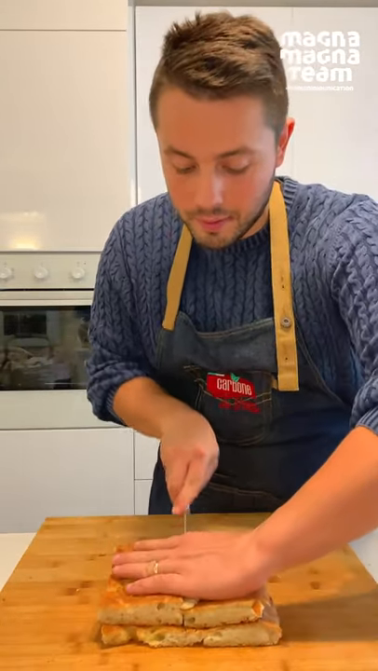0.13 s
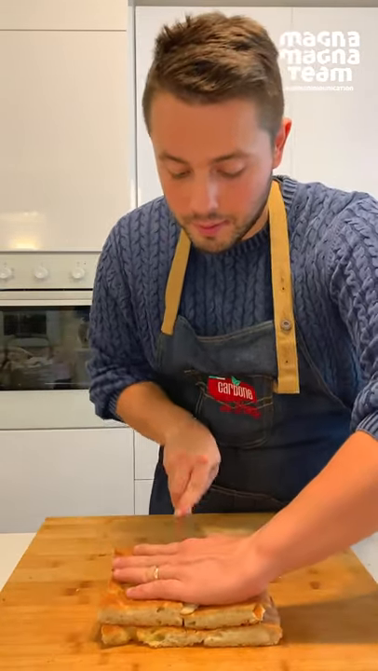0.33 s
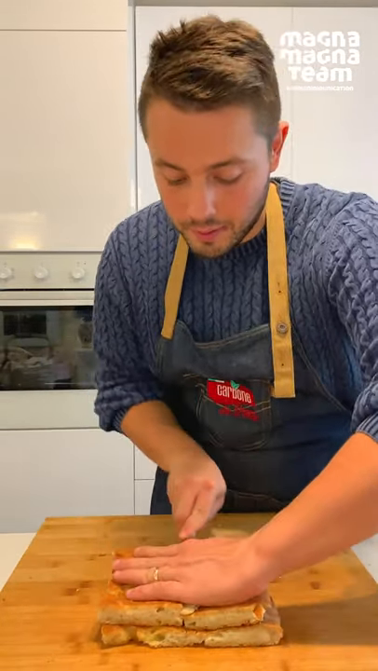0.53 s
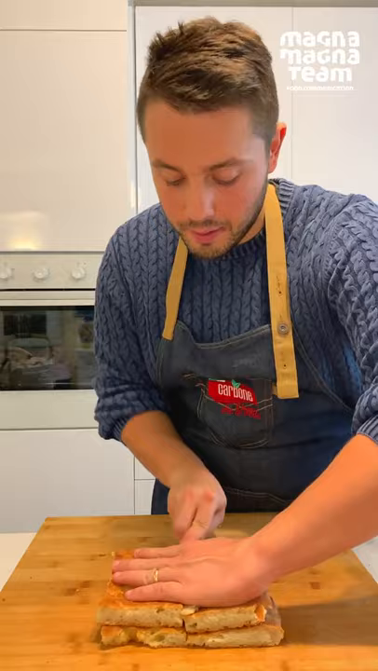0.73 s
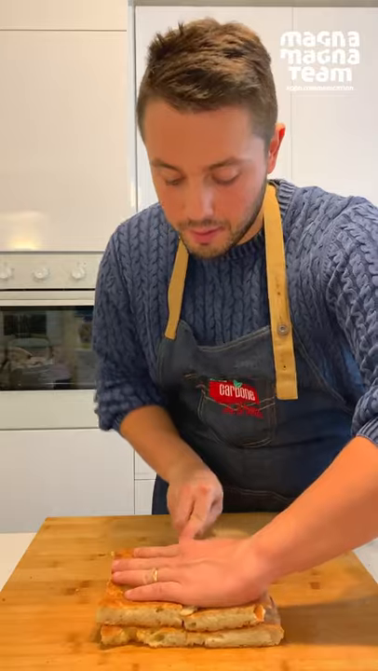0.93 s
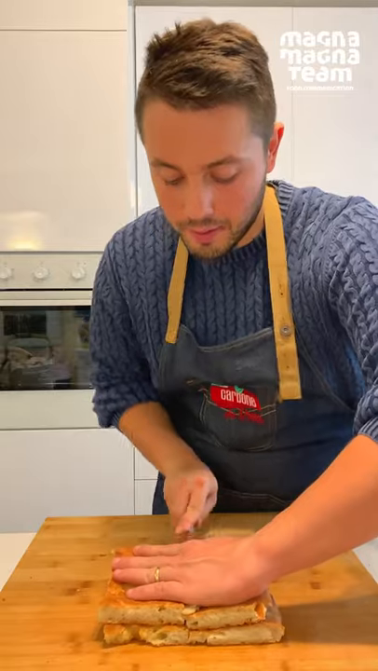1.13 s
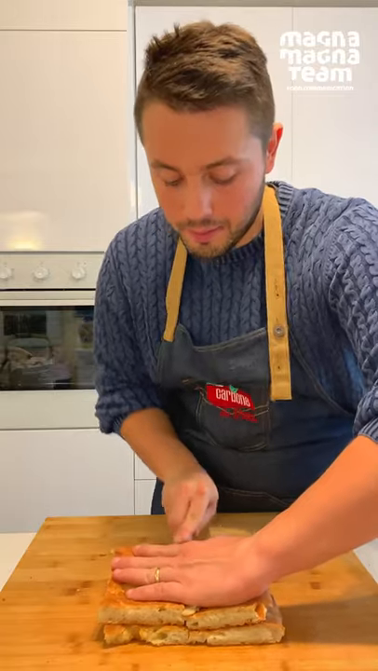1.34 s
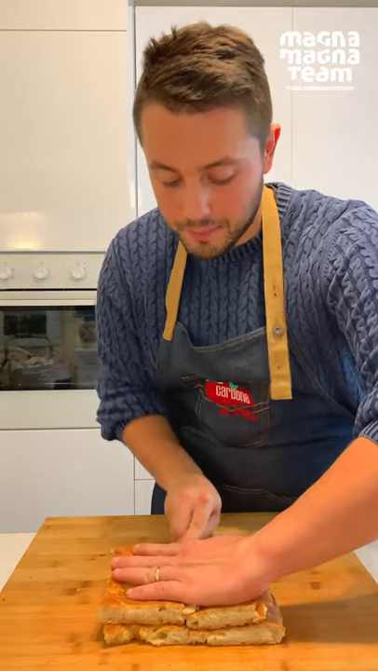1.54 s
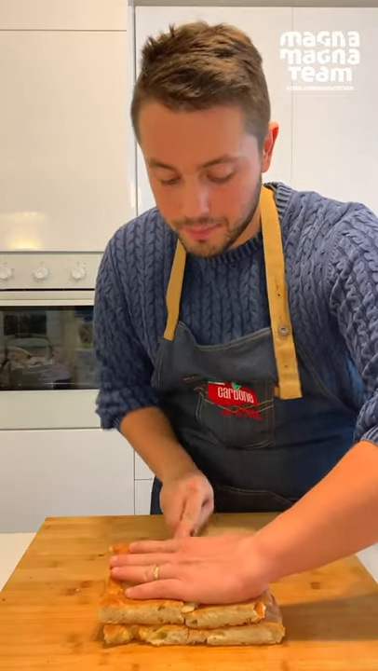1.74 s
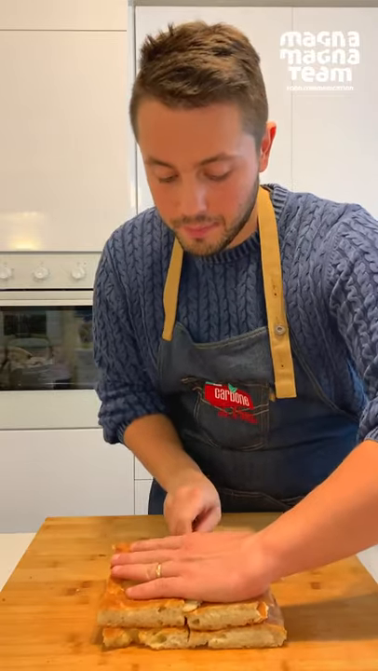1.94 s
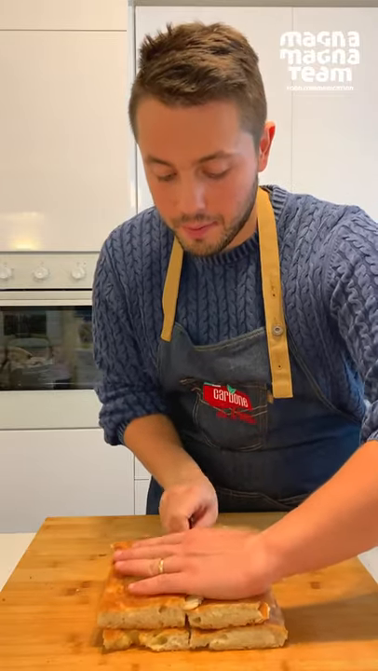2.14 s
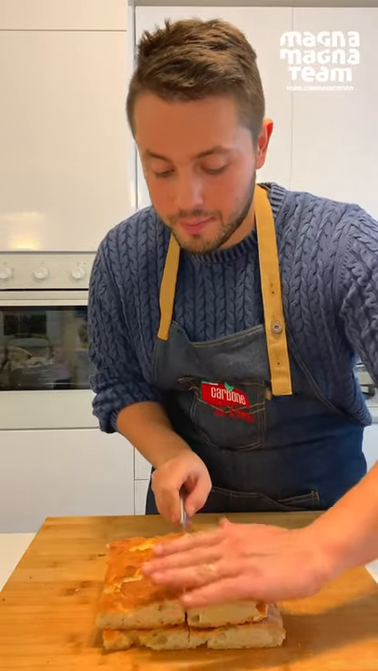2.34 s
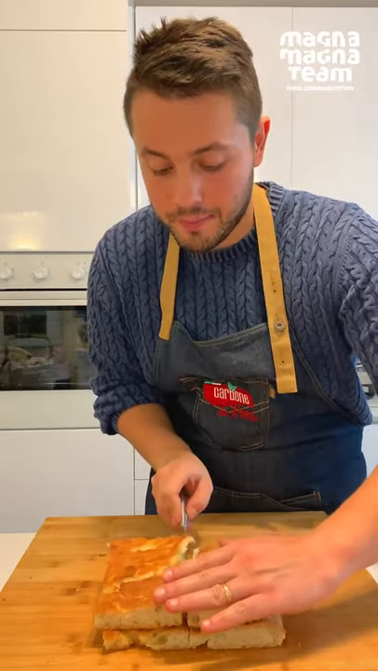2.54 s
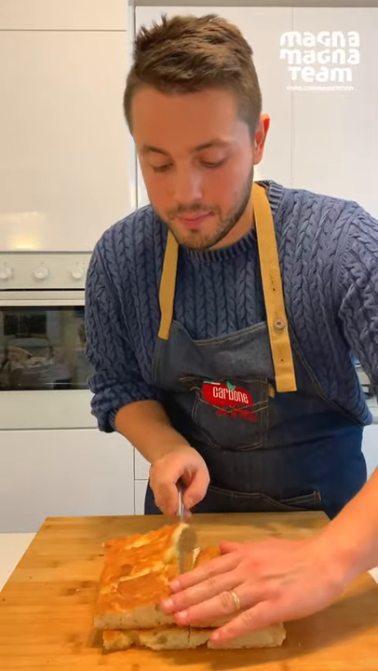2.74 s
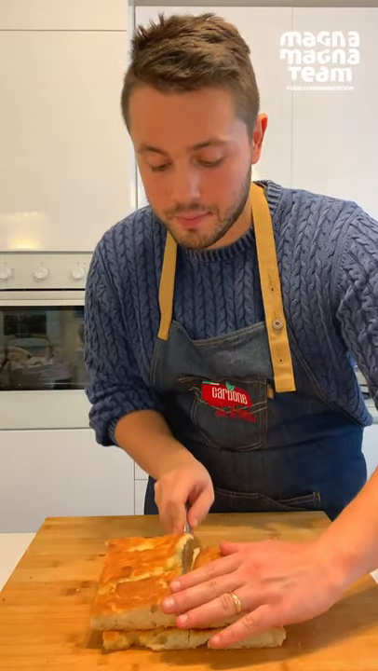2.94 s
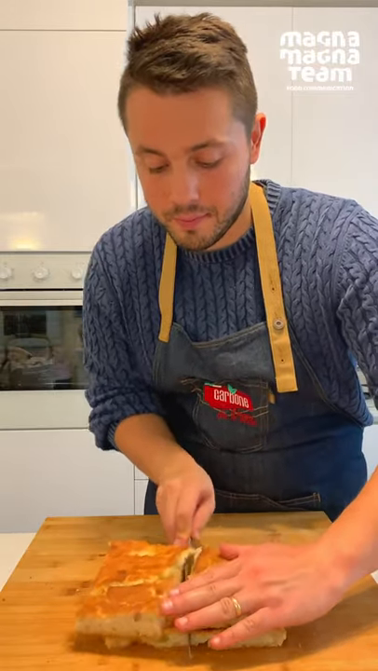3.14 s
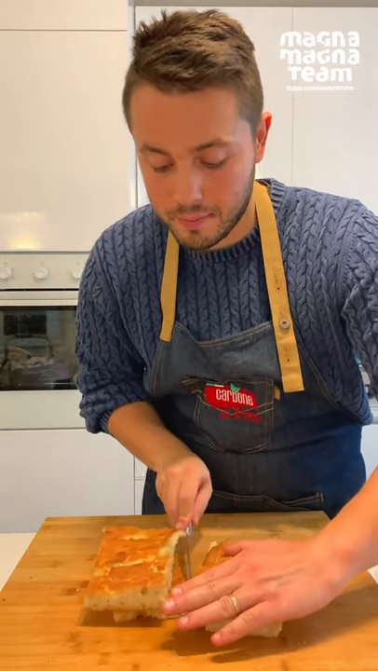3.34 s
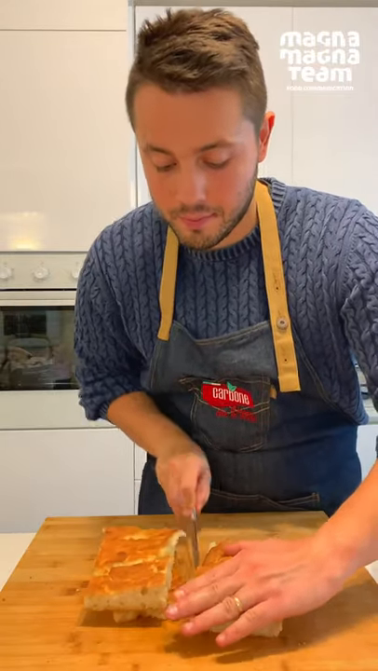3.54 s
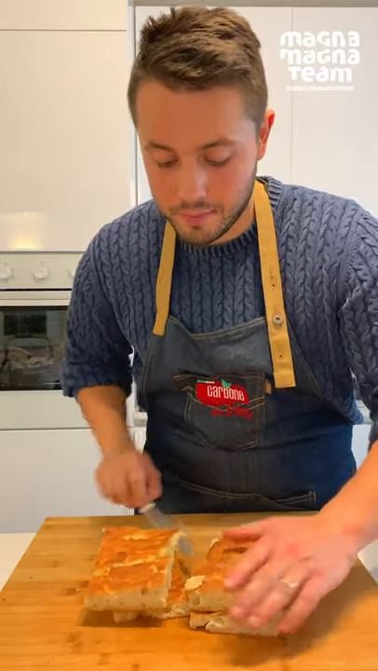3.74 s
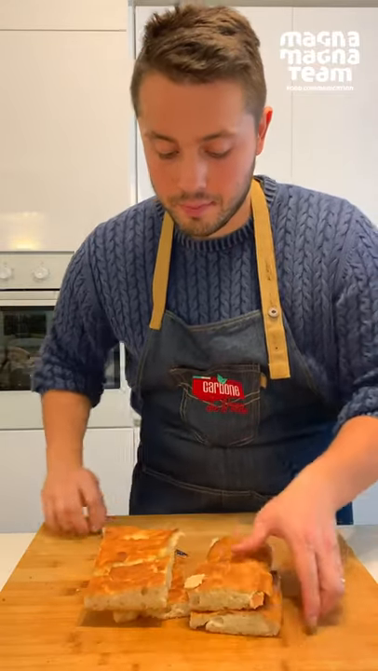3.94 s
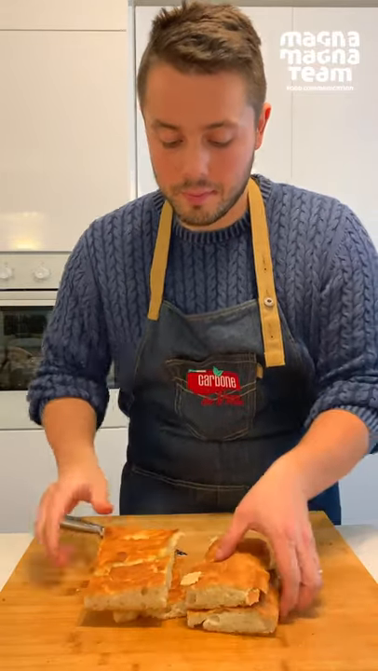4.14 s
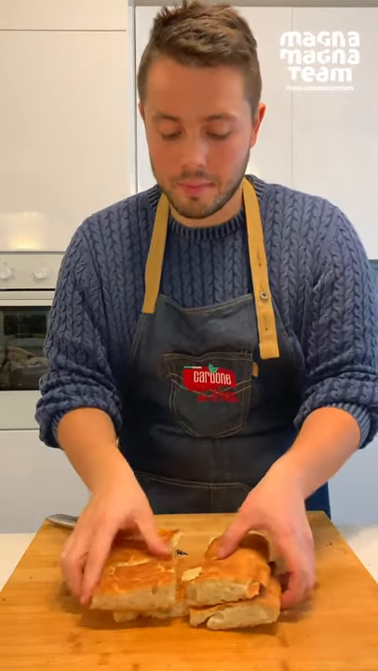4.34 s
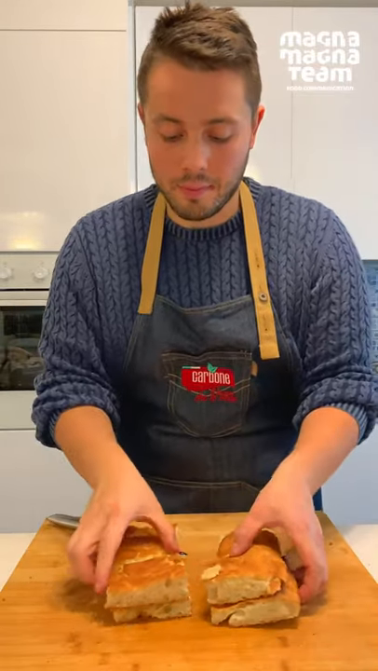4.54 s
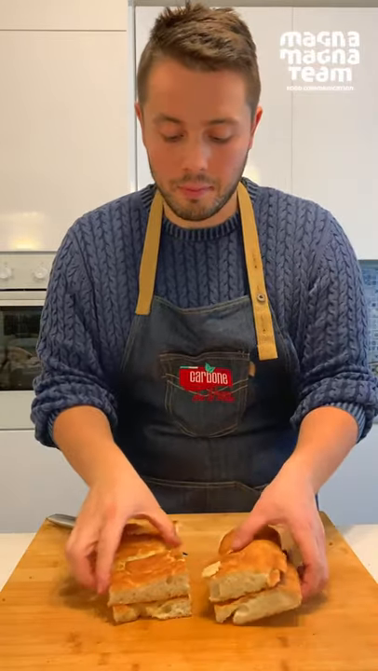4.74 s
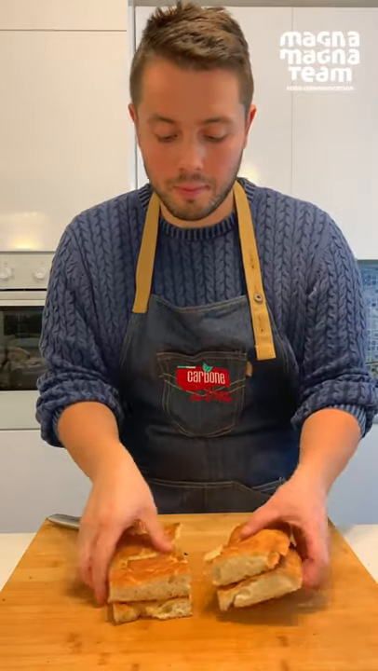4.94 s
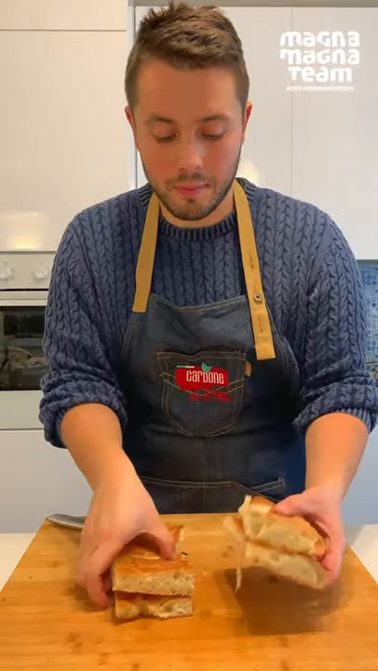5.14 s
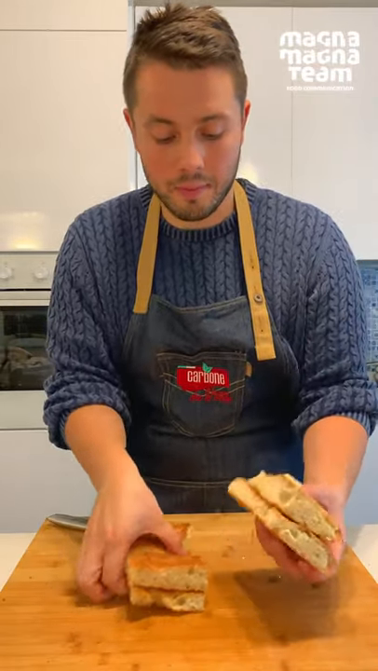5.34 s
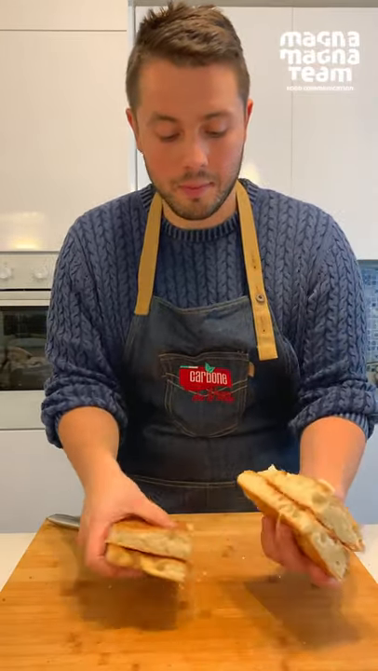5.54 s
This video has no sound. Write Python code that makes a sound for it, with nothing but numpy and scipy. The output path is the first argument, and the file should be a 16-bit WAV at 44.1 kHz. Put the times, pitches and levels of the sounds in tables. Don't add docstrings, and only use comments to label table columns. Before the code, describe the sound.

Stereo, near pickup with slight room echo: about seven brisk strokes a second grow louder through dry, crunchy bread, then ease off, with small crust pops and a low rumble of the shaken counter. Quiet handling, two longer scraping strokes on the board, then a knife landing in a double sharp clack with light chatter and a thin fading ring. Gentle crusty rustles end it over a low refrigerator hum.

```python
import sys
import numpy as np
from scipy import signal
from scipy.fft import rfft, irfft
from scipy.io import wavfile

SR = 44100
rng = np.random.default_rng(int(sys.argv[2]) if len(sys.argv) > 2 else 0)


def convert_level_to_amplitude(level_db):
    exponent = np.asarray(level_db, float) / 20
    return 10 ** exponent


def wrap_up_sound(samples):
    columns = np.atleast_2d(samples).T
    tamed = np.clip(columns, -1, 1)
    steps = np.round(tamed * 32767).astype(np.int16)
    wavfile.write(sys.argv[1], SR, steps)


N = 246078
SLOW = 40
DROP = slice(round(3.7 * SR), round(4.6 * SR))

# pitch in Hz, level in dB, time to fade by 60 dB in seconds.
BLADE_TONES = [(3080, -27.5, .51), (3553, -44, .6), (4350, -32.5, .6), (5040, -26.5, .7), (6010, -1, .084),
               (6175, -14, .3), (7418, -30, .59), (8200, -24, .23), (8423, -16, .5), (8614, -19, .43),
               (9388, -27, .5), (10240, -35, .31), (10560, -29, .3), (11520, -38.5, .26)]
# pitch in Hz, level in dB, time to fade by 60 dB in seconds.
COUNTER_TONES = [(252, -17.5, 0.084), (440, -20, 0.013), (597, -23.5, 0.018), (1050, -2.5, 0.045),
                 (1430, 4.5, 0.025), (1750, 4, .025), (2322, 1.5, 0.041)]


def rms_one(x):
    return x / np.sqrt(np.mean(x ** 2) + 1e-20)


def full(slow):
    return np.repeat(slow, SLOW)[:N]


def at_hz(points, hz):
    point_hz, values = np.transpose(points)
    return np.interp(np.log1p(hz), np.log1p(point_hz), values)


def drift(rate_hz):
    r = np.exp(-2 * np.pi * rate_hz * SLOW / SR)
    noise = rng.standard_normal(N // SLOW + 2001)
    return rms_one(signal.lfilter([1], [1, -2 * r, r * r], noise)[2000:])


def band_pass(x, low_hz, high_hz):
    return signal.sosfilt(signal.butter(2, [low_hz, high_hz], "band", fs=SR, output="sos"), x)


def ring(hits, hz, t60_s):
    r, w = convert_level_to_amplitude(-60 / (t60_s * SR)), 2 * np.pi * hz / SR
    return signal.lfilter([0, np.sin(w)], [1, -2 * r * np.cos(w), r * r], hits + 1e-18)


def clicks(times_s, levels_db):
    out = np.zeros(N)
    out[np.round(np.multiply(times_s, SR)).astype(int)] = convert_level_to_amplitude(np.asarray(levels_db))
    return out


def grains(per_s, spread_db, size):
    size_draw, time_draw = rng.random((2, 2, size))
    sizes = convert_level_to_amplitude(spread_db * np.minimum(-np.log(size_draw + 1e-9), 4.0))
    chance = per_s / SR
    return sizes * np.sign(time_draw - chance / 2) * (time_draw < chance)


def add_pulse(out, s, db, hz, width_s, fall):
    reach = np.arange(-400, 400)
    age = reach / SR / width_s
    bend = np.logaddexp(age, -age)
    wave = np.cos(2 * np.pi * hz * width_s * (age - fall * bend))
    out[round(s * SR) + reach] += convert_level_to_amplitude(db) * np.exp(-age ** 2) * wave


def swells(peak_s, rise_s, fall_s, db, bluntness):
    peak_s, rise_s, fall_s, db = [np.reshape(column, (-1, 1)) for column in (peak_s, rise_s, fall_s, db)]
    off_s = np.arange(N // SLOW + 1) * SLOW / SR - peak_s
    span_s = np.where(off_s < 0, rise_s, fall_s)
    edge_loss_db = 19.5
    loss_db = edge_loss_db * np.abs(off_s / span_s) ** np.where(off_s < 0, *bluntness)
    return np.sum(convert_level_to_amplitude(2 * (db - np.minimum(loss_db, 200))), axis=0)


def room_air():
    # pitch in Hz, level per Hz in dB.
    air_color = [(20, -22), (40, -6), (62, 3.5), (85, -6.5), (130, -0.5), (250, -2), (330, 1.5),
                 (500, -1.5), (700, -7), (1000, -5.5), (2000, -20.5), (3100, -33), (6300, -36.5),
                 (11000, -42)]
    hz = np.maximum(np.fft.rfftfreq(N, 1 / SR), 1)
    noise = irfft(rfft(rng.standard_normal((2, N))) * convert_level_to_amplitude(at_hz(air_color, hz)), N)
    return convert_level_to_amplitude(-55) * rms_one(noise)


def refrigerator():
    # pitch in Hz, level in dB, width of the wavering in Hz.
    hum_tones = [(101.3, -62, 6), (59, -74.5, 8)]
    turn = 2 * np.pi * np.arange(N) / SR
    out = np.zeros(N)
    for hz, db, width_hz in hum_tones:
        strength = full(convert_level_to_amplitude(db + 3.5 + 1.7 * drift(width_hz)))
        out += strength * np.sin(hz * turn + 0.4 * full(drift(width_hz)))
    return out


def effort():
    # peak in seconds, rise in seconds, fall in seconds, crumb level in dB, crust level in dB.
    saw_strokes = [(.015, 0.04, 0.11, -51, -56), (0.157, 0.078, 0.13, -41.5, -50.5),
                   (0.296, 0.029, 0.097, -40, -51), (.428, 0.041, 0.095, -37, -46),
                   (0.569, 0.047, 0.071, -35.5, -52.5), (0.691, 0.075, 0.099, -33, -51.5),
                   (.815, 0.044, 0.081, -23, -44.5), (.915, 0.036, .12, -27, -46),
                   (1.097, 0.089, .06, -29, -52), (1.228, 0.13, 0.11, -38.5, -52.5),
                   (1.352, 0.052, 0.1, -33, -42.5), (1.45, 0.041, 0.11, -30, -43),
                   (1.593, 0.056, 0.076, -30.5, -41.5), (1.719, 0.12, 0.16, -37.5, -51.5),
                   (1.919, 0.085, 0.13, -52.5, -61), (2.951, 0.029, 0.085, -58, -62),
                   (3.03, 0.075, 0.016, -45, -59.5), (3.222, 0.17, 0.15, -39, -51),
                   (3.488, 0.08, .1, -39, -54.5), (3.78, 0.044, 0.11, -60, -63)]
    # peak, rise and fall in seconds, crumb level in dB, crust level in dB.
    hand_moves = [(2.1, 0.068, 0.12, -86, -72), (2.17, 0.024, 0.093, -49.5, -80),
                  (2.245, 0.024, .1, -55.5, -69), (3.639, 0.03, 0.11, -73, -67.5),
                  (4.4, 0.13, 0.16, -59, -68.5), (4.531, 0.047, 0.058, -50, -69),
                  (4.63, 0.038, .04, -56, -73.5), (4.75, 0.043, 0.24, -58.5, -72.5),
                  (4.92, 0.073, 0.069, -54.5, -66.5), (5.09, .04, 0.1, -65, -67),
                  (5.261, 0.091, 0.095, -54.5, -61.5), (5.41, 0.071, 0.092, -57, -62.5),
                  (5.52, 0.053, 0.063, -74.5, -61.5)]
    peak_s, rise_s, fall_s, crumb_db, crust_db = np.transpose(saw_strokes + hand_moves)

    def level_db(db, bluntness, rest_db):
        power = swells(peak_s, rise_s, fall_s, db, bluntness)
        return full(10 * np.log10(power + convert_level_to_amplitude(2 * rest_db)))

    return level_db(crumb_db, (1.801, 1.25), -75.5), level_db(crust_db, (4.0, 1.84), -92)


def fractures(spectrum, low_hz, high_hz, per_s, spread_db, cycles, patchy_db, count, shaping_db):
    breaks = grains(per_s, spread_db, N)
    dealt = rng.integers(0, count, N)
    out = np.zeros((2, N))
    for k, hz in enumerate(np.geomspace(low_hz, high_hz, count)):
        gain_db = at_hz(spectrum, hz) + 10 * np.log10(hz) + patchy_db * drift(5.9) + shaping_db(hz)
        r, w = convert_level_to_amplitude(-60 * hz / cycles / SR), 2 * np.pi * hz / SR
        even = np.sqrt(1 - r * r)
        hits = breaks * ((dealt == k) * full(convert_level_to_amplitude(gain_db)))
        out += signal.lfilter([even, 0, -even], [1, -2 * r * np.cos(w), r * r], hits)
    return rms_one(out)


def sawing():
    # pitch in Hz, level per Hz in dB.
    crumb_color = [(71, -26), (120, -10.5), (194, -13.5), (327, -5), (591, 0), (659, -2), (706, -4.5),
                   (1020, -6), (1920, -15.5), (3200, -25.5), (4160, -54), (7040, -120)]
    # pitch in Hz, level per Hz in dB.
    crust_color = [(1530, -31), (2600, -7.5), (3830, -1), (5950, -3), (6470, -1), (9600, -4.5),
                   (11100, 1.5), (11800, -26), (12200, -42), (15900, -75), (22000, -120)]
    # time in seconds, pitch in Hz.
    loaf_tone = [(0, 580), (.16, 674), (.3, 890), (.43, 656), (.82, 755), (.93, 900), (1.07, 670),
                 (1.35, 960), (1.6, 850), (1.9, 666), (2.9, 745), (3.2, 930), (3.55, 940), (4.3, 700)]
    # pitch in Hz, lift in dB, width in octaves.
    board_lifts = [(425, 7.5, 0.11), (1050, 7, 0.072), (1412, -5, .25), (2050, 2.2, .1)]
    # pitch in Hz, level in dB, time to fade by 60 dB in seconds.
    song_tones = [(5020, -5, .5), (5090, -6, .4), (8420, -5, .5), (8500, -5, .4), (10490, -2, .7),
                  (10580, -2, .6), (6500, -6, .2)]
    crumb_db, crust_db = effort()
    step_s = np.arange(N // SLOW + 1) * SLOW / SR
    loaf_s, loaf_points_hz = np.transpose(loaf_tone)
    loaf_hz = np.interp(step_s, loaf_s, loaf_points_hz)
    rasp_db = 3.5 + 0.64 * (crust_db - crumb_db)[::SLOW]
    board_from_s, palms_from_s = 2.9, 4.3
    scraping = (step_s > board_from_s) & (step_s < palms_from_s)

    def palm_db(hz):
        return -8 / (1 + (6400 / hz) ** 8) * (step_s > palms_from_s)

    def loaf_db(hz):
        lift_db = 5.6 * np.exp(-(np.log2(hz / loaf_hz) / 0.26) ** 2)
        for top_hz, db, octaves in board_lifts:
            lift_db += db * np.exp(-(np.log2(hz / top_hz) / octaves) ** 2) * scraping
        lift_db += 3.6 / (1 + (hz / 140) ** 4)
        return lift_db + (rasp_db + 13.0) / (1 + (1300 / hz) ** 4)

    crumb = fractures(crumb_color, 66.7, 2653, per_s=4000, spread_db=1.25, cycles=21.0, patchy_db=3.1,
                      count=30, shaping_db=loaf_db)
    crust = fractures(crust_color, 3120, 9910, per_s=11000, spread_db=3.5, cycles=33.0, patchy_db=2.6,
                      count=12, shaping_db=palm_db)
    blade = rms_one(sum(ring(crust[0], hz, 0.12) for hz, db, t60_s in BLADE_TONES[1:16:3]))
    rub = convert_level_to_amplitude(crust_db - 15) * full(scraping) * rng.standard_normal((2, N))
    song = np.zeros((2, N))
    for hz, db, t60_s in song_tones:
        song += convert_level_to_amplitude(db) * np.sqrt(30 / (t60_s * SR)) * ring(rub, hz, t60_s)
    return song + convert_level_to_amplitude(crumb_db + 0.84) * crumb + convert_level_to_amplitude(crust_db + 2.0) * (crust + convert_level_to_amplitude(-13.5) * blade)


def counter_shaking():
    # time in seconds, level in dB.
    arm_shakes = [(.07, -63), (.32, -51), (.54, -50), (.76, -56), (.97, -49.5), (1.25, -50), (1.55, -64),
                  (1.99, -57), (3.15, -58.5)]
    s, db = np.transpose(arm_shakes)
    power = swells(s, 0.15, 0.15, db, (1.5, 1.5))
    return full(np.sqrt(power)) * rms_one(band_pass(rng.standard_normal(N), 40, 90))


def snaps():
    # time in seconds, peak in dB, pitch of the pock in Hz, brightness of the tick in dB.
    crust_breaks = [(0.084, -34, 1180, -8), (0.175, -25.5, 716, -10), (0.291, -26.5, 1050, -5),
                    (0.41, -26, 664, -12), (0.643, -36, 640, -19), (0.784, -28, 800, -19),
                    (0.895, -20, 810, -10), (1.322, -32, 1280, -9), (1.58, -21, 1090, -12),
                    (3.028, -29, 987, -12), (5.264, -30.5, 950, -4.5)]
    out = np.zeros(N)
    for s, db, hz, bright_db in crust_breaks:
        add_pulse(out, s + 0.0016, db - 2.5, hz, 0.88 / hz, 0.2)
        add_pulse(out, s + 0.00027, db + bright_db, 5500, 0.00012, 0)
    return out


def knocks():
    # time in seconds, peak in dB, handle pitch in Hz,
    # edge tick in dB, counter level in dB.
    contacts = [
        (3.8112, -38.5, 2020, -9.5, -6.5),
        (3.8371, -27.5, 1890, 2.5, -8),
        (3.904, -34.5, 1610, -0.5, -8),
        (3.933, -28, 1970, -17.5, -12.5),
        (3.9441, -1.5, 1962, -20, -12.5),
        (3.973, -33.5, 1870, -9.5, -18),
        (3.981, -7.5, 1780, -3.5, -23),
        (3.9958, -24.5, 1890, -13, -18),
    ]
    # pitch in Hz, level in dB, time to fade by 60 dB in seconds.
    held_tones = [(2000, -4, .09), (2751, -21.5, .11), (3063, -8, .5), (3540, -2, .2), (4370, -16.5, .33),
                  (4800, -20, .5), (5860, -3.5, .14), (7197, -11, .34), (8400, -10, .2), (9340, -12, .19)]
    # start in seconds, pitch in Hz, level in dB, time to fade by 60 dB in seconds.
    lasting_tone = (3.946, 6977, -64, 2.8)
    s, db, handle_hz, tick_db, counter_db = np.transpose(contacts)
    out = np.zeros(N)
    for t, peak_db, hz, edge_db, low_db in zip(s, db, handle_hz, tick_db, counter_db):
        add_pulse(out, t + 0.00028, peak_db + low_db + 0.5, 1.41 * hz, 0.0005, 0.2)
        add_pulse(out, t + 0.001414, peak_db + 0.34, hz, 0.00055, 0.25)
        add_pulse(out, t + 0.0011, peak_db + edge_db, 5950, 0.0007, 0)
        add_pulse(out, t + 0.00371, peak_db + low_db - 5.5, 1150, 0.0012, 0.3)
        add_pulse(out, t + 0.005, peak_db + low_db - 8.0, 450, 0.0022, 0.3)
    for hz, tone_db, t60_s in COUNTER_TONES:
        hits = clicks(s + 0.002, db + counter_db + tone_db - 8.5)
        out[DROP] += ring(hits[DROP], hz, t60_s)
    blade_db = db + tick_db - 7.5
    held = s < 3.92
    for tones, used, longest_s in (held_tones, held, 0.14), (BLADE_TONES, ~held, 0.5):
        for hz, tone_db, t60_s in tones:
            chance_db = rng.normal(0, 4.5, len(s))
            hits = clicks(s[used], (blade_db + tone_db + chance_db)[used])
            out[DROP] += ring(hits[DROP], hz, min(t60_s, longest_s))
    start_s, hz, tone_db, t60_s = lasting_tone
    return out + ring(clicks([start_s], [tone_db]), hz, t60_s)


def rocking_db(part):
    # time in seconds, upper blade level in dB, counter level in dB, lower blade level in dB.
    wakings = [
        (3.813, -46, -56.5, -51),
        (3.839, -37, -41.5, -33.5),
        (3.957, -34.5, -35.5, -54.5),
        (3.984, -30.5, -40.5, -45.5),
    ]
    s = np.array(wakings)[:, :1]
    level_db = np.array(wakings)[:, part + 1, None]
    age_s = np.arange(N)[DROP] / SR - s
    late_s = np.maximum(age_s, 0)
    tail_db_per_s = (103.5, 49.5, 60.5)[part]
    quick_fade = convert_level_to_amplitude(-2 * 247 * late_s)
    slow_tail = convert_level_to_amplitude(2 * (-4.5 - tail_db_per_s * late_s)) * (age_s <= age_s[-2])
    wake = convert_level_to_amplitude(2 * (level_db + 1398 * np.minimum(age_s, 0)))
    return 10 * np.log10(np.sum(wake * (quick_fade + slow_tail), axis=0) + 1e-12)


def chatter():
    upper_db, counter_db, lower_db = rocking_db(0), rocking_db(1), rocking_db(2)
    taps = grains(3000, 1.4, len(upper_db))
    tones = []
    for hz, db, t60_s in BLADE_TONES:
        strength = convert_level_to_amplitude(0.55 * db + 3.9 * full(drift(16))[DROP])
        tones.append(strength * rms_one(ring(taps, hz, 0.049)))
    lower, upper = rms_one(sum(tones[1:4])), rms_one(sum(tones[4:]))
    freed = np.interp(np.arange(N)[DROP] / SR, [3.92, 3.95], [0.4, 1])
    edge = rms_one(band_pass(taps, 5000, 11000))
    heel = rms_one(band_pass(taps, 2500, 5200))
    wood = rms_one(sum(convert_level_to_amplitude(db) * ring(taps, hz, 0.39 * t60_s) for hz, db, t60_s in COUNTER_TONES))
    out = np.zeros((2, N))
    out[:, DROP] += convert_level_to_amplitude(np.minimum(upper_db, -28) + 2.3) * (freed * upper + convert_level_to_amplitude(-3.0) * edge)
    out[:, DROP] += convert_level_to_amplitude(np.minimum(lower_db, -43) + 6.5) * (convert_level_to_amplitude(-0.5) * freed * lower + convert_level_to_amplitude(-6.5) * heel)
    out[:, DROP] += convert_level_to_amplitude(np.minimum(counter_db, -36) - 1.5) * wood
    return out * np.interp(np.arange(N) / SR, [3.76, 3.8, 4.36, 4.5], [0, 1, 1, 0])


def arm_thud():
    arm_push = (4.03, 60, -44, .07)
    s, hz, db, rise_s = arm_push
    age = np.maximum(np.arange(N) / SR - s, 0) / rise_s
    return convert_level_to_amplitude(db) * age ** 2 * np.exp(2 - 2 * age) * np.sin(2 * np.pi * hz * rise_s * age)


def kitchen(x):
    t60_s, wall_cut_hz = 0.74, 8900
    w = 2 * np.pi * np.fft.rfftfreq(2 ** 15)
    dull = 1 / (1 + 1j * w * SR / (2 * np.pi * wall_cut_hz))
    tails = np.zeros((2, len(w)), complex)
    lags = (rng.uniform(0.008, 0.03, size=16) * SR).astype(int)
    for k, lag in enumerate(lags):
        loop = convert_level_to_amplitude(-60 * lag / SR / t60_s) * dull ** (lag / 900) * np.exp(-1j * w * lag)
        tails[k % 2] += loop / (1 - loop) * (-1) ** (k // 2)
    return signal.oaconvolve(x[None], irfft(tails))[:, :N]


def ports(pair, side):
    # pitch in Hz, left-right likeness from 0 to 1.
    port_likeness = [(30, 0.55), (170, 1), (500, 0.67), (1420, 0.75), (4090, 0.36), (11800, 0.16)]
    hz = np.maximum(np.fft.rfftfreq(N, 1 / SR), 1)
    alike = np.clip(at_hz(port_likeness, hz), 0, 1)
    balance_db, lead_rad = side
    direct, scattered = rfft(pair)
    shared = np.sqrt((1 + alike) / 2) * direct
    apart = np.sqrt((1 - alike) / 2) * scattered
    half = convert_level_to_amplitude(at_hz(balance_db, hz) / 2) * np.exp(0.5j * at_hz(lead_rad, hz))
    return irfft([(shared + apart) * half, (shared - apart) / half], N)


def scene():
    # pitch in Hz, lead of the left in radians.
    bread_place = [
        [(60, -2.5), (140, -5), (350, -5.0), (840, -4), (2020, -1.5), (4880, -1.5), (11800, 0.5)],
        [(0, 0.5), (2070, 0.2), (4740, 4), (5080, 4.5), (8870, 8), (10200, 3), (12000, 26.5)],
    ]
    # pitch in Hz, left over right in dB; pitch in Hz, lead in radians.
    knife_place = [
        [(60, 1), (140, 1), (350, -9.5), (840, -3), (2020, -2), (4880, -2), (11800, 0)],
        [(0, -1), (2070, 0.7), (3100, 1.47), (5510, -6.5), (7150, -4.5), (10900, -15.5), (12000, -17.5)],
    ]
    direct_scattered = [[1], [0.3]]
    bread = sawing() + snaps() * direct_scattered
    blows, rattle = knocks(), chatter()
    near = ports(bread + room_air(), bread_place) + ports(rattle, knife_place)
    near += ports(blows * direct_scattered, knife_place) * convert_level_to_amplitude([[-1.5], [1.5]])
    echo = convert_level_to_amplitude(-24) * kitchen(bread[0] + rattle[0] + blows)
    return near + echo + counter_shaking() + arm_thud() + refrigerator()


def low_pass(x):
    return signal.sosfilt(signal.butter(12, 12360, fs=SR, output="sos"), x)


def record(dry):
    passed = signal.sosfilt(signal.butter(3, 45, "high", fs=SR, output="sos"), dry)
    passed = signal.sosfilt(signal.butter(12, 11300, fs=SR, output="sos"), passed)
    return low_pass(passed)


dry = scene()
out = record(dry)
wrap_up_sound(out)
```